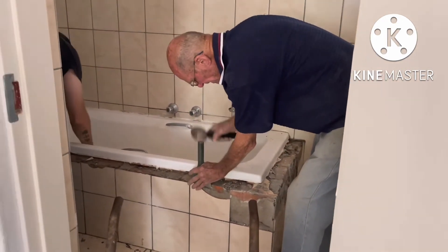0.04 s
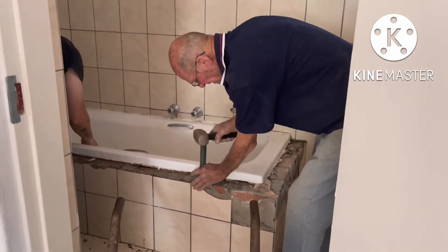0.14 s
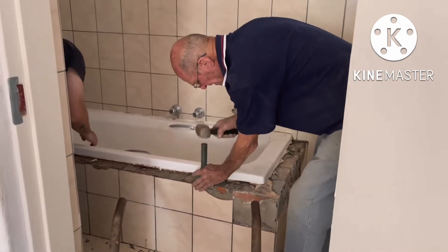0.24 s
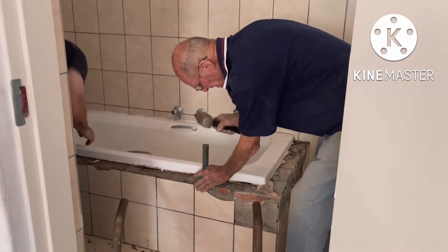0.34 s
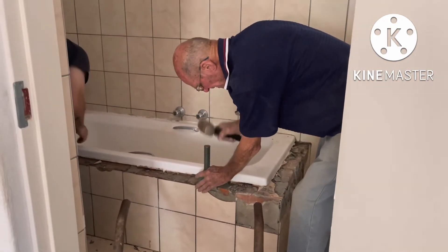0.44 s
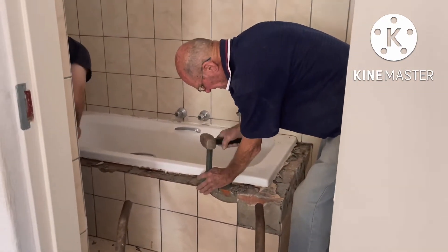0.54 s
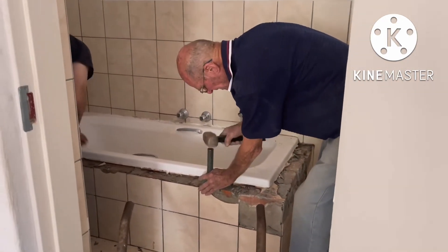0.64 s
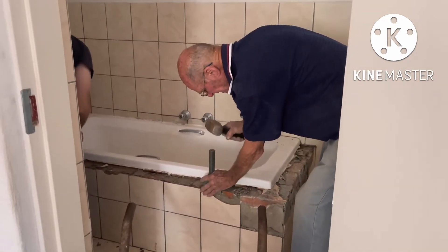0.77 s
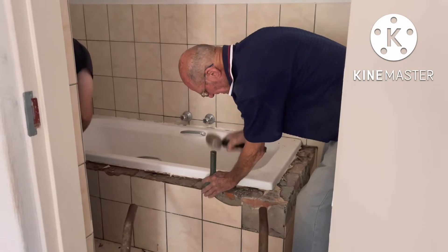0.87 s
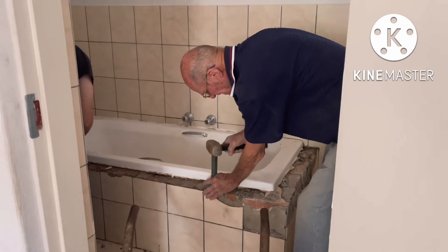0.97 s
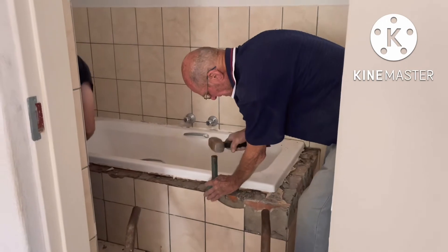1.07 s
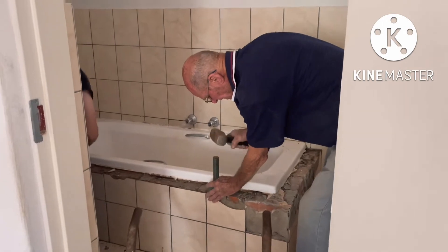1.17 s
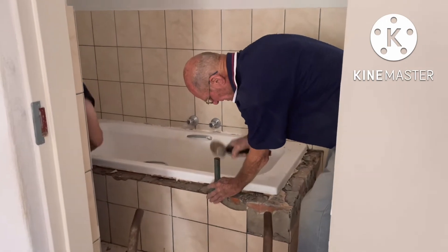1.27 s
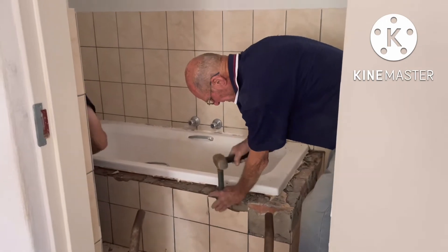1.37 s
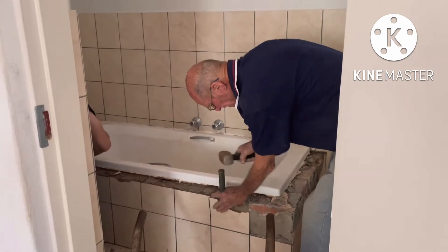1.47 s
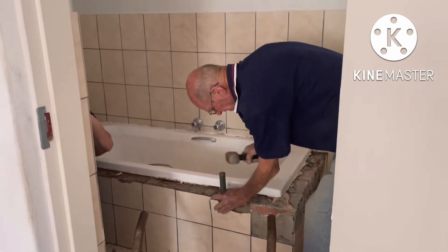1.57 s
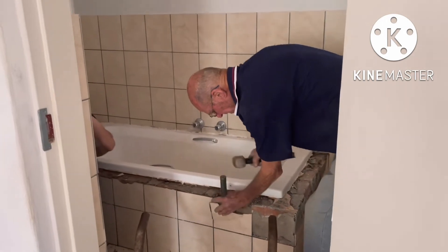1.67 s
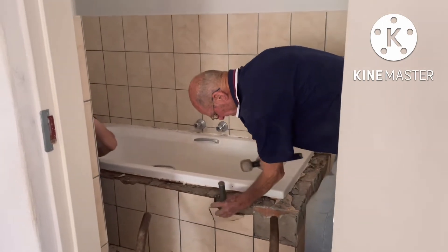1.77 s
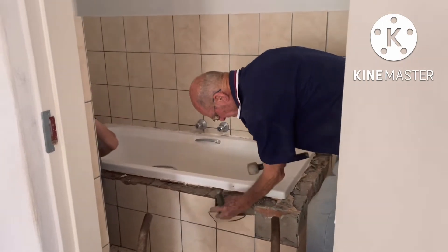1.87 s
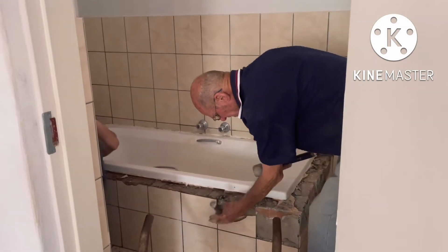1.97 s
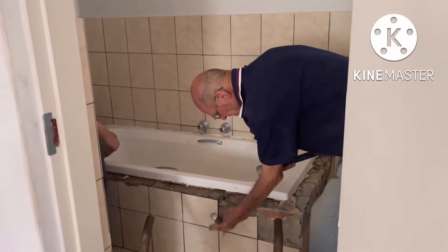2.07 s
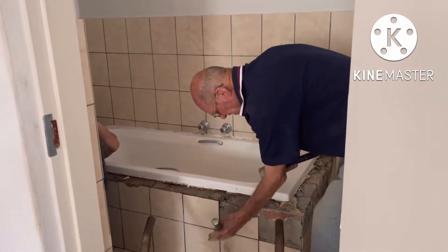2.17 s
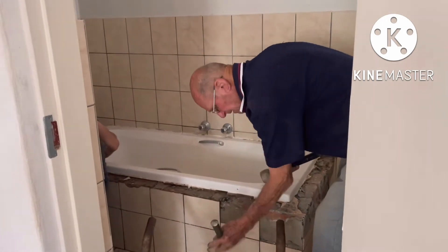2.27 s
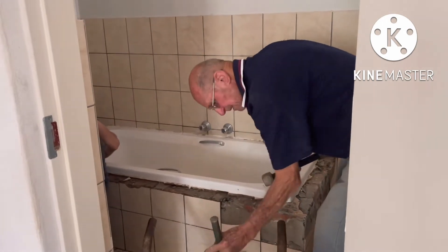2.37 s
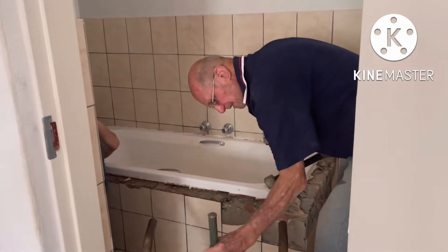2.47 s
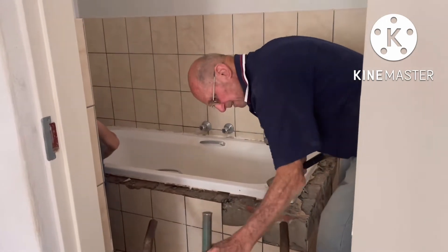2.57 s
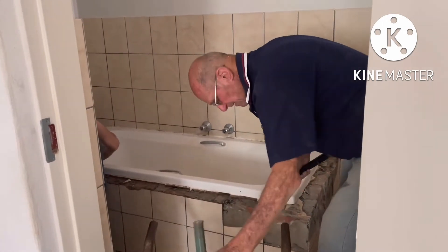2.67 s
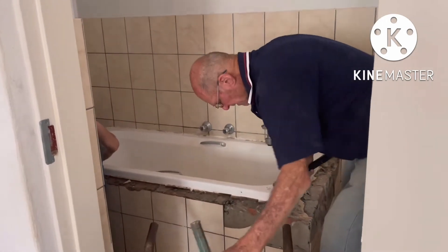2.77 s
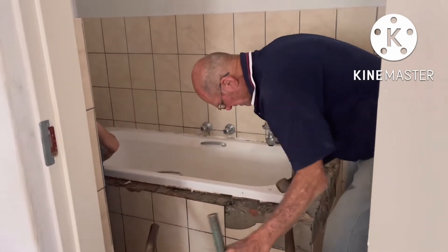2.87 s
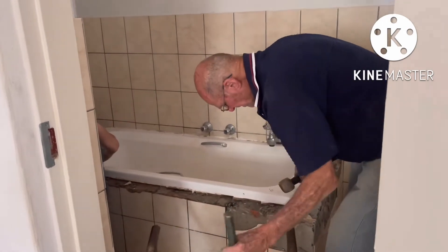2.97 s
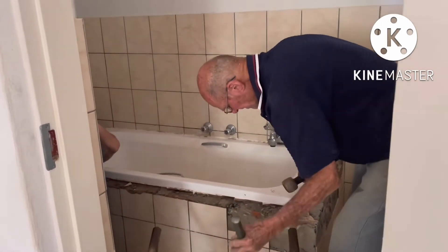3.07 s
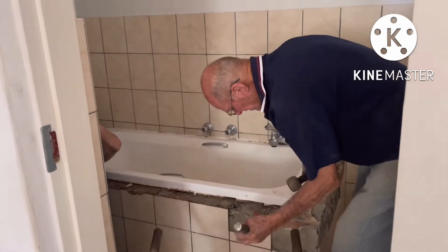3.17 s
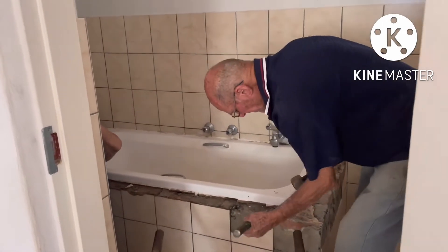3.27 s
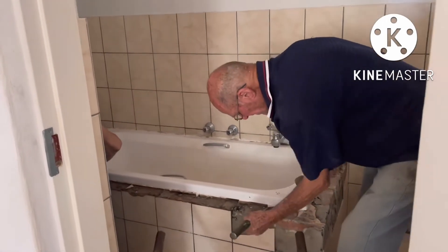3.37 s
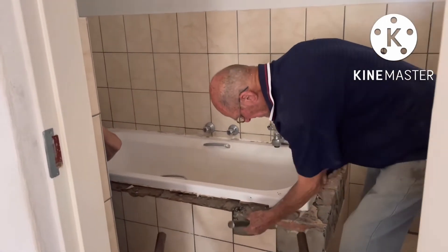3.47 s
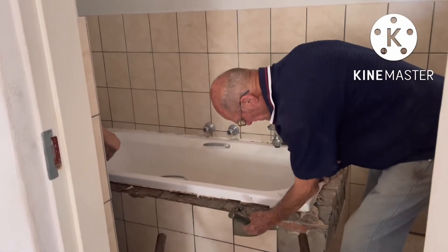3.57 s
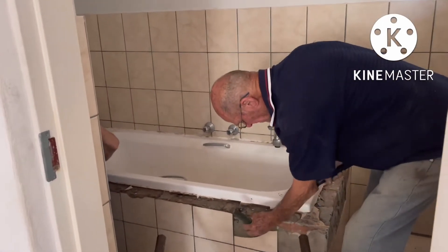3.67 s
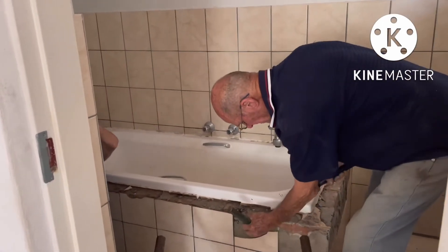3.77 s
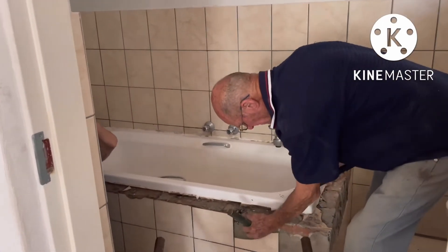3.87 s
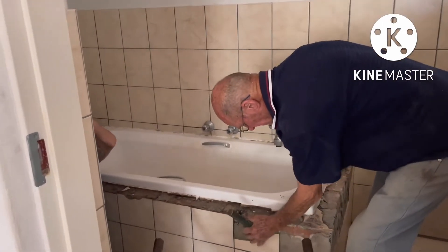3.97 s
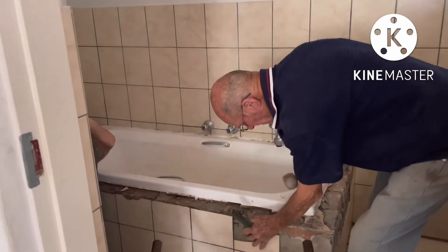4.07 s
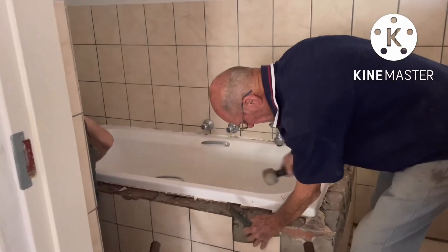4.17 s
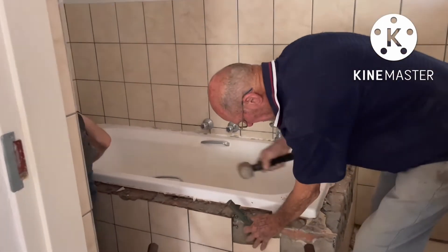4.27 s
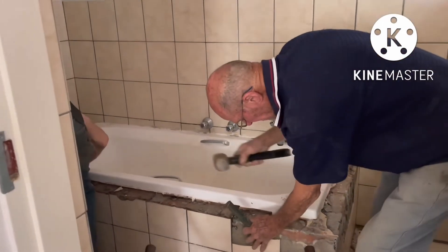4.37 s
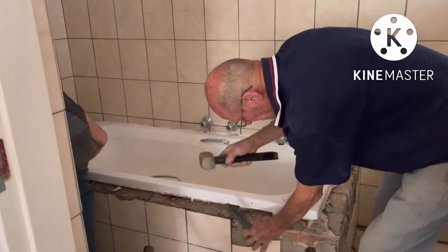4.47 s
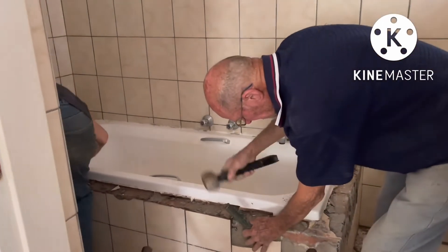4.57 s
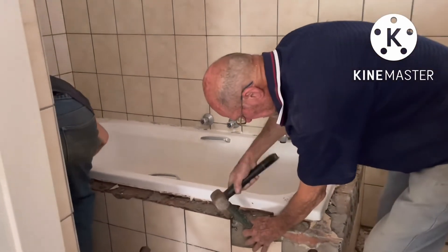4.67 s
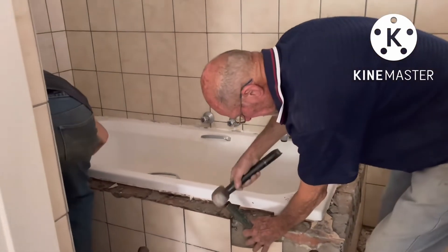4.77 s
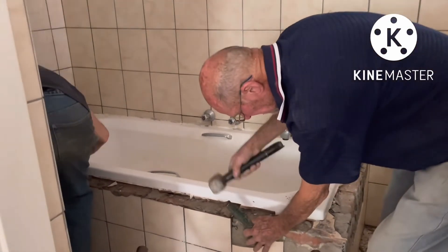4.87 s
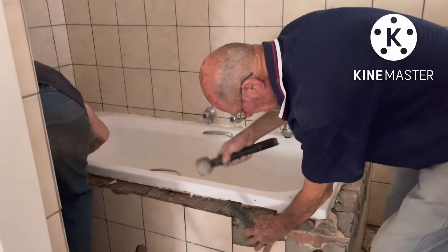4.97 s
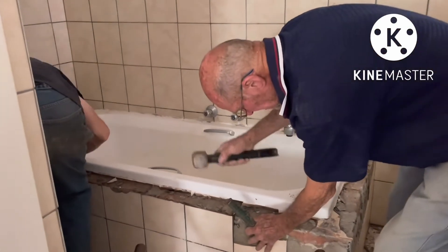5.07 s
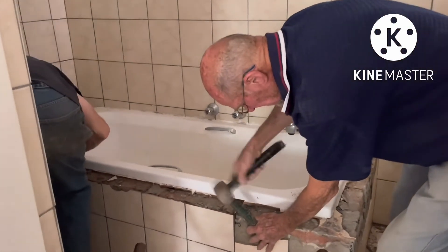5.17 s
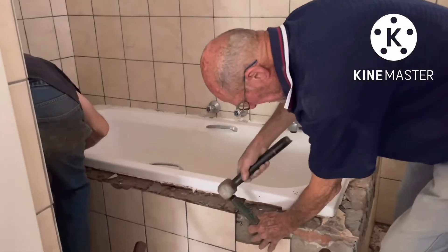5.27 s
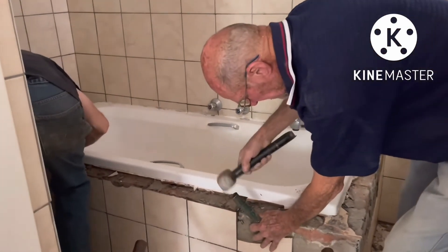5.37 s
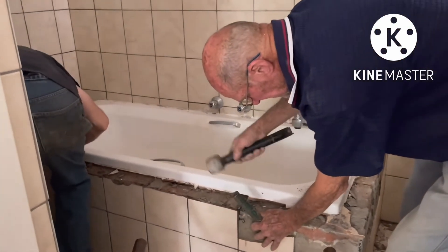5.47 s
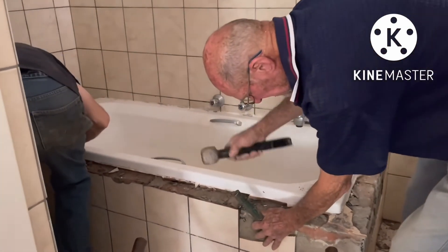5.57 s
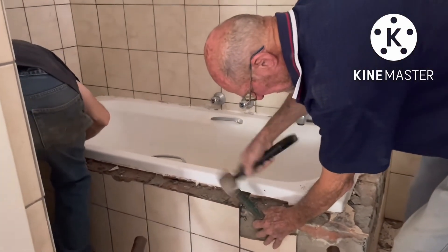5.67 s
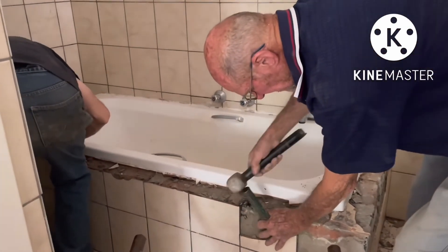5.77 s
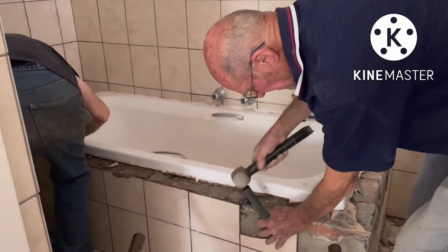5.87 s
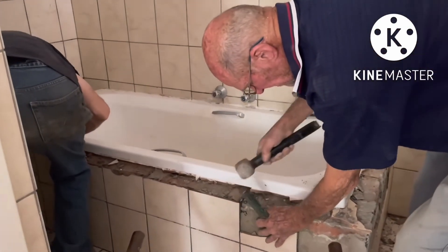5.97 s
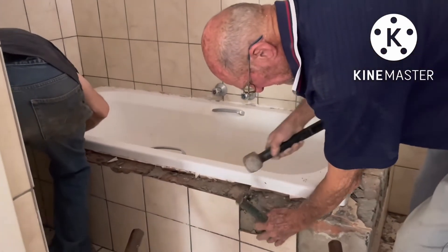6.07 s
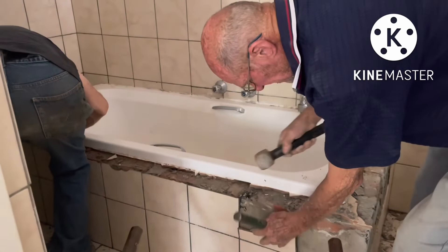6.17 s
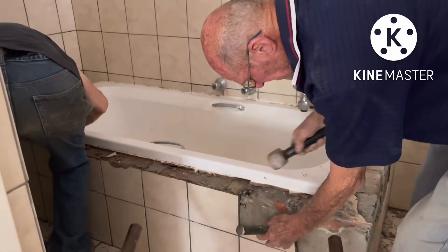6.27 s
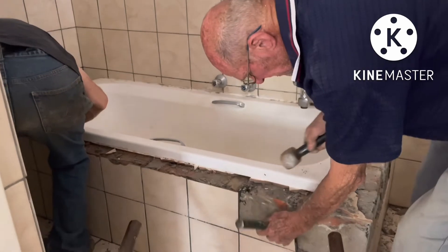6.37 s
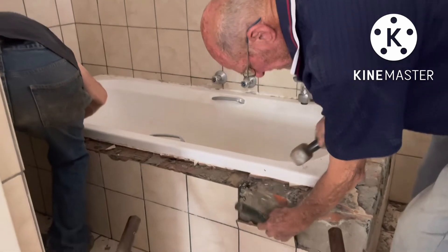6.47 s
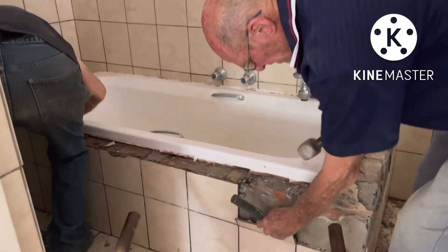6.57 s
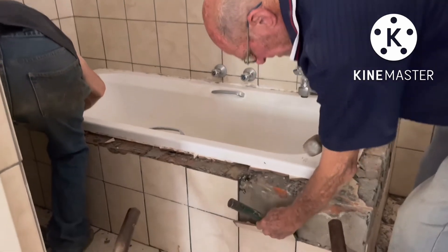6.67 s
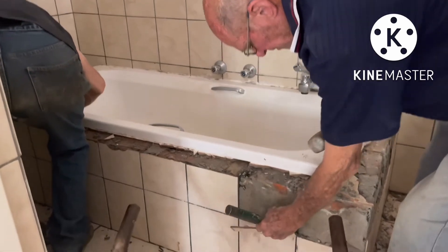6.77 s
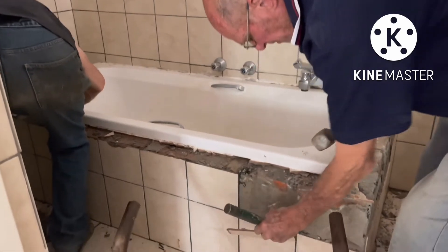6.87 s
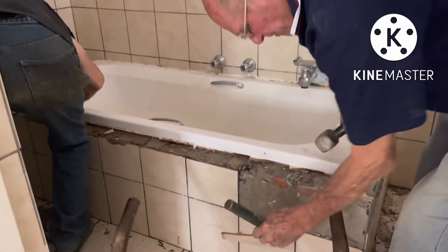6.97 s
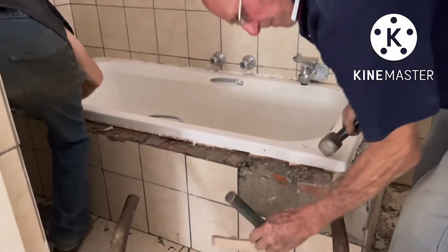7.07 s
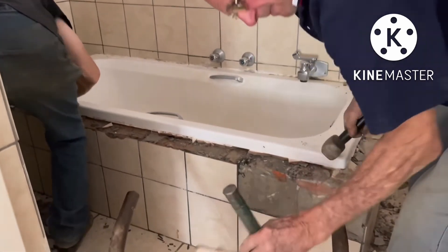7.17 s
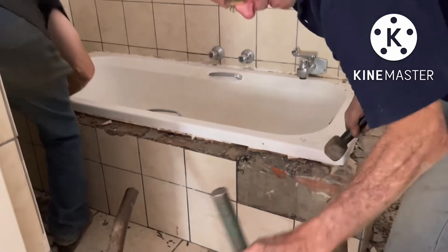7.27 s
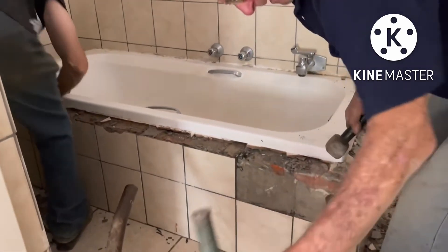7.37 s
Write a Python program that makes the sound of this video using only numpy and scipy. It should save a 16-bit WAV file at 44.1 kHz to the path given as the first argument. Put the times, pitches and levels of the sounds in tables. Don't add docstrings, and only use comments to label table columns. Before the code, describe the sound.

In a small, hard tiled bathroom, four sharp hammer-on-chisel blows crack brick, with a low judder along the tub after the first. A gritty lull follows, then another strong blow snaps off a shard and rubble bumps hollowly on the bathtub. After quiet scraping and ticks, three heavier, spaced blows ring out, leaving light chips and clinks. Close phone microphone, loud cracks compressed, about a second of reverberation.

```python
import sys
import numpy as np
from scipy import signal
from scipy.fft import rfft, irfft, next_fast_len
from scipy.io import wavfile

SR = 44100
rng = np.random.default_rng(int(sys.argv[2]) if len(sys.argv) > 2 else 0)


def store_wav(level_fs):
    pcm = np.round(np.clip(np.atleast_2d(level_fs), -1, 1) * 32767)
    wavfile.write(sys.argv[1], SR, pcm.T.astype(np.int16))


def elevation(decibels):
    levels = np.asarray(decibels, float)
    return 10 ** (levels / 20)


N = 327795

# (frequency [Hz], level [dB], t60 [s])
TUB = [(64, -10.5, 0.28), (104, -4.5, 0.19), (144.1, -1, 0.24), (184.25, -3.5, 0.144), (215, 1, 0.13),
       (253.2, -1, 0.087), (321.2, -1.5, 0.065), (458, -5.5, 0.13), (554, -6, 0.085), (604, 0.5, 0.043),
       (760, -13, 0.049), (865, -2, 0.081), (1019, 0, 0.059)]
# (frequency [Hz], likeness [0-1])
LIKENESS = [(100, 0.98), (290, 0.94), (640, 0.01), (1400, 0.07), (3100, 0.49), (6800, 0.79), (10000, 0.98)]


def rms_one(x):
    return x / np.sqrt(np.mean(x ** 2) + 1e-20)


def at_hz(points, hz):
    points = np.array(points)
    return np.interp(np.log(hz), np.log(points[:, 0]), points[:, 1])


def clicks(times_s, gains):
    out = np.full(N, 1e-18)
    out[np.round(np.asarray(times_s) * SR).astype(int)] += gains
    return out


def ring(x, hz, t60_s):
    radius, angle = elevation(-60 / (t60_s * SR)), 2 * np.pi * hz / SR
    return signal.lfilter([0, np.sin(angle)], [1, -2 * radius * np.cos(angle), radius * radius], x)


def band(x, low_hz, high_hz):
    return signal.sosfilt(signal.butter(2, [low_hz, high_hz], "band", fs=SR, output="sos"), x)


def soft(x, cut_hz):
    pole = np.exp(-2 * np.pi * cut_hz / SR)
    return signal.lfilter([(1 - pole) ** 2], [1, -2 * pole, pole * pole], x)


def puffs(times_s, gains, rise_s, t60_s, low_hz, high_hz):
    rise, fall = np.exp(-1 / (rise_s * SR)), elevation(-60 / (t60_s * SR))
    decay = signal.lfilter([1], [1, -fall], clicks(times_s, gains))
    shape = signal.lfilter([1 - rise], [1, -rise], decay)
    return shape * rms_one(band(rng.standard_normal(N), low_hz, high_hz))


def struck(times_s, modes, db, spread_db):
    luck = rng.standard_normal((len(times_s), 2 * len(modes)))
    out = np.zeros(N)
    for k, (hz, mode_db, t60_s) in enumerate(modes):
        gains = elevation(db + mode_db + spread_db * luck[:, 2 * k]) * np.sign(luck[:, 2 * k + 1])
        out += ring(clicks(times_s, gains), hz, t60_s)
    return out


def swells(times_s, swell_s, fade_s, db):
    t = np.arange(0, N + 64, 64) / SR
    late = t[:, None] - times_s
    below_db = 20 * np.maximum(-late / np.maximum(swell_s, 1e-3), late / np.maximum(fade_s, 1e-3))
    gain = np.sqrt(np.sum(elevation(db - below_db) ** 2, axis=1))
    return np.interp(np.arange(N) / SR, t, gain)


def spread(mid, side, hz):
    alike = np.clip(at_hz(LIKENESS, hz), 0, 1)
    return np.sqrt(1 + alike) * mid + np.sqrt(1 - alike) * side * [[1], [-1]]


def steady(colour):
    hz = np.arange(1, N // 2 + 2) * SR / N
    mid, side = rfft(rng.standard_normal((2, N)))
    return rms_one(irfft(spread(mid, side, hz) * elevation(at_hz(colour, hz)), N))


def notes(places, strengths, swell_s):
    out, t = np.zeros(N), np.arange(16384) / SR
    for (s, hz), (db, t60_s) in zip(places, strengths):
        part = out[round(s * SR):][:len(t)]
        envelope = elevation(db - 60 * t / max(t60_s, .01)) * (1 - np.exp(-t / swell_s))
        part += (envelope * np.sin(2 * np.pi * hz * t))[:len(part)]
    return out


def blows():
    # (time [s], crack [dB], thud [dB], stone [dB])
    blow_table = [
        (0.0454, 0, -20.5, -8.5),
        (0.4788, 5.5, -57, -6),
        (0.8887, 1.5, -36, -9),
        (1.2865, 11, -33, -5.5),
        (2.7852, 7.5, -33, -6.5),
        (2.8126, -8, -66, -20.5),
        (4.63, 3.5, -18.5, -6.5),
        (5.179, 7, -19.5, -7.5),
        (5.6836, 7, -27, -8),
    ]
    s, crack_db, thud_db, stone_db = np.transpose(blow_table)
    s = s - .0012
    early = puffs(s - .007, elevation(stone_db - 23.5), 0.0039, 0.015, 370, 12000)
    thud = struck(s + 0.00373, TUB[:7], thud_db - 3.5, spread_db=1.5)
    thud += puffs(s, elevation(thud_db - 4.5), 0.012, 0.133, 88, 480)
    return early + masonry(s, crack_db, stone_db) + steel() + thud


def masonry(times_s, crack_db, stone_db):
    # (frequency [Hz], level [dB])
    pieces = [
        [(800, 0), (1260, 2.5), (2040, 1), (2680, 1.5), (3490, 0), (4500, -6.5), (5400, -9.5), (6380, -7),
         (7650, -5)],
        [(620, -1.5), (1190, 1), (2040, 1), (2740, -2), (3580, -4.5), (4600, -6.5), (5300, -9), (6120, -6.5),
         (7700, -8)],
        [(560, -1), (870, 0), (1350, 1), (1920, -2.5), (2330, -1.5), (3450, 0), (4700, -6.5), (5910, -2.5),
         (8350, -6)],
        [(780, -2), (1400, 0.5), (2110, -1.5), (2620, 0), (3380, -13.5), (3830, -2), (5850, -5.5)],
        [(710, 1.5), (1390, 0.5), (2680, -0.5), (3400, -2), (4240, -7), (4750, -3), (7520, 2)],
        [(1520, 3), (2600, 5), (3100, -12.5), (4600, -2), (5710, 4), (6500, -6), (7500, -9)],
        [(850, -7), (1350, -0.5), (1850, -1), (2310, -1.5), (3730, -1), (5290, -6), (6220, -11.5), (7700, -13)],
        [(1250, 3), (1890, 1), (2950, -0.5), (4290, 1), (5590, -4.5), (7700, -8)],
        [(1030, 0), (1910, -3), (2920, -8), (3590, -2), (4740, -8), (5670, -5), (7650, -6)],
    ]
    # note decay at 1 kHz, t60 [s]
    note_t60_s = [0.013, 0.011, .011, 0.00821, 0.0085, 0.0099, .011, 0.0087, 0.015]
    splinter_db = [13, 6, 1, 3.5, 6.5, 15, 5, 4.5, 0]
    damping = 0.4
    out, tap = np.zeros(N), np.eye(1, 4096, 128)[0] + 1e-18
    crack, splinters = band(tap, 352, 4900), band(tap, 7130, 8830)
    luck = rng.random((len(times_s), 48))
    for i, at_s in enumerate(times_s):
        body = np.zeros(4096)
        for k, (hz, db) in enumerate(pieces[i]):
            khz = hz / 1000
            body += (-1) ** k * elevation(db) * khz ** damping * ring(tap, hz, note_t60_s[i] * khz ** -damping)
        fracture = elevation(crack_db[i]) * (crack + elevation(splinter_db[i]) * splinters)
        out[round(at_s * SR) - 128:][:4096] += crush(fracture + elevation(stone_db[i]) * body, luck[i])
    return out


def crush(x, luck):
    crush_s = .006
    knots = np.linspace(0, len(x) // 2, len(luck))
    late = np.interp(np.arange(len(x) // 2 + 1), knots, luck ** 2 * crush_s * SR)
    return irfft(rfft(x) * np.exp(-2j * np.pi * np.cumsum(late) / len(x)), len(x))


def steel():
    # (time [s], mode groups near 11.1 kHz [dB], 3.3 kHz [dB], 3.85 kHz [dB], 7.67 kHz [dB])
    contacts = [(0.0444, -1, -22, -31, -16), (0.4765, -5.5, -25, -23, -16.5), (0.891, -1, -31, -40, -55),
                (1.2859, -5, -16, -21.5, -22.5), (1.319, -2, -9, -19, -35), (2.785, -40, -25, -46, -40),
                (3.65, -37.5, -53.5, -49, -60), (3.688, -50.5, -44.5, -42, -60),
                (4.6338, -1.5, -38, -30, -18), (5.177, -6, -21.5, -38.5, -30),
                (5.686, -3.5, -48.5, -30.5, -39.5)]
    mode_hz = [
        [11075, 11150, 11640],
        [3281, 3322, 3165],
        [3836, 3866, 6325, 6821],
        [5846, 8900],
        [7670, 7625, 7735],
    ]
    # (level [dB], t60 [s])
    mode_strengths = [
        [(3, 0.033), (-12, 0.042), (-22.5, 0.12)],
        [(-8.5, 0.284), (0.5, 0.065), (-22, 0.17)],
        [(-1.5, 0.12), (-13.5, 0.1), (-6, 0.25), (-3.5, 0.09)],
        [(0, 0.1), (-12, 0.07)],
        [(-1.5, 0.25), (-18.5, 0.05), (-10.5, .04)],
    ]
    rows = np.array(contacts)
    rows = np.insert(rows, 4, rows[:, 2] - 6.5, axis=1)
    out = np.zeros(N)
    for k, (hz, strengths) in enumerate(zip(mode_hz, mode_strengths)):
        out += struck(rows[:, 0], np.column_stack((hz, strengths)), rows[:, 1 + k] - 5, spread_db=3.0)
    grip_db = 3.5 * rms_one(soft(rng.standard_normal(N), 40))
    return soft(out * elevation(grip_db), 15000)


def snap():
    # (time [s], peak [dB])
    snaps = [
        (2.812, -3.5),
    ]
    s, db = np.transpose(snaps)
    return puffs(s - .001, elevation(db + 5.0), 0.0007, 0.014, 2500, 12000)


def tile_notes():
    # (time [s], frequency [Hz])
    places = [(.479, 1190), (.479, 2034), (.479, 2127), (.479, 3550), (.479, 3677), (.889, 880),
              (.889, 1325), (.889, 1935), (.889, 2340), (1.3, 1500), (4.631, 3708), (5.18, 1300),
              (5.18, 1880), (5.18, 4414), (5.18, 7682), (5.685, 984), (5.685, 1162), (5.685, 1900),
              (5.685, 1990), (5.685, 2731), (5.685, 6500), (5.685, 7673)]
    # (peak [dB], t60 [s])
    strengths = [(-25, .12), (-18, .15), (-21, .2), (-26, 0.14), (-25.5, 0.135), (-24, 0.176), (-28, 0.093),
                 (-22.5, .12), (-24.5, 0.093), (-21, 0.101), (-20, 0.14), (-25, 0.089), (-20, .15),
                 (-31, 0.107), (-33, .12), (-29, 0.15), (-29, 0.113), (-25, 0.23), (-24, .35), (-30, .15),
                 (-33, 0.092), (-39, .15)]
    return notes(places, strengths, swell_s=.001)


def hollow_notes():
    # (time [s], frequency [Hz])
    places = [(2.908, 232), (2.908, 700), (3.008, 232), (3.064, 555), (3.11, 450), (3.15, 222), (3.2, 225),
              (3.274, 700), (3.274, 1000), (3.375, 200), (4.633, 214), (4.633, 104), (5.182, 214)]
    # (peak [dB], t60 [s])
    strengths = [(-16.5, 0.14), (-21, 0.155), (-15.5, 0.15), (-16, 0.076), (-24.5, 0.18), (-20.5, .12),
                 (-27, .1), (-21, 0.14), (-29, .08), (-26, .1), (-19.5, 0.23), (-20, 0.28), (-22, 0.193)]
    return notes(places, strengths, swell_s=0.0076)


def clink_notes():
    # (time [s], frequency [Hz])
    places = [(3.612, 8230), (3.622, 3850), (3.635, 5868), (3.635, 6320), (3.635, 6831), (3.64, 3316),
              (3.645, 3838), (3.647, 3866), (3.685, 3850), (7.063, 2075), (7.082, 1900), (7.098, 2040),
              (7.113, 1782), (7.113, 5260), (7.14, 1960), (7.35, 3316), (7.36, 3850), (7.388, 1800),
              (7.388, 1000), (7.416, 2760), (7.416, 4620), (7.416, 6000)]
    # (peak [dB], t60 [s])
    strengths = [(-41.5, 0.16), (-39, 0.079), (-39.5, 0.2), (-42.5, .25), (-44, 0.21), (-43.5, .3),
                 (-26.5, 0.23), (-31, 0.23), (-36, 0.1), (-39, 0.2), (-29.5, 0.045), (-41, 0.13),
                 (-40.5, 0.11), (-44, 0.054), (-43.5, 0.067), (-61, 0.37), (-53.5, 0.3), (-51, 0.19),
                 (-50, 0.19), (-39, .1), (-44, .1), (-36, .05)]
    return notes(places, strengths, swell_s=.003)


def bumps():
    # (time [s], peak [dB], hollow note [Hz], rattle [dB])
    bump_table = [(2.909, -15, 239, -18), (3.011, -18, 238, -23), (3.069, -16.5, 526, -19),
                  (3.099, -17, 666, -30), (3.159, -24, 215, -48), (3.209, -22, 220.5, -44),
                  (3.278, -17.5, 250, -29), (3.299, -20.5, 693, -24), (3.339, -22, 221.4, -28),
                  (3.379, -30.5, 223, -32.5), (3.417, -43, 215, -37), (3.46, -31.5, 215, -61),
                  (3.646, -30.5, 180.8, -37), (3.688, -50, 190.7, -55), (3.759, -42, 276, -33),
                  (6.208, -42.5, 206, -42.5), (6.412, -57, 207, -43)]
    # (time [s], deep thud [dB])
    settling = [
        (3.068, -50),
        (3.42, -46),
        (3.646, -45),
        (3.76, -41.5),
        (3.928, -57.5),
        (6.41, -57.5),
    ]
    s, db, hollow_hz, rattle_db = np.transpose(bump_table)
    deep_s, deep_db = np.transpose(settling)
    hollow = np.zeros(N)
    for at_s, peak_db, hz in zip(s, db, hollow_hz):
        tap = elevation(peak_db - 3.0) * np.eye(1, 8192)[0] + 1e-18
        hollow[round(at_s * SR):][:8192] += ring(tap, hz, 0.093)
    shell_modes = [(hz, mode_db, 1.07 * t60_s) for hz, mode_db, t60_s in TUB[3:]]
    shell = struck(s, shell_modes, db - 13.0, spread_db=4.5)
    deep = struck(deep_s, TUB[1:3], deep_db + 3.5, spread_db=5.5)
    clatter = puffs(s, elevation(db - 7.0), 0.0014, 0.091, 220, 1656)
    clatter += puffs(s, elevation(rattle_db), 0.0059, 0.048, 1200, 16400)
    return band(band(hollow + shell, 135, 2800), 135, 2800) + soft(deep, 400) + clatter


def judder():
    # (time [s], level [dB], slip rate [1/s])
    slide = [
        (0.225, -16, 107.7),
        (0.24, -18, 102),
        (0.285, -16.5, 114),
        (0.303, -18, 125),
        (0.322, -15.5, 105.5),
        (0.346, -17.5, 113.5),
        (0.376, -17, 116.5),
        (0.409, -33, 115),
        (0.431, -47, 93),
    ]
    # (frequency [Hz], level [dB], t60 [s])
    panel = [(109.2, 1, 0.0345), (186.2, -1, 0.11), (250, -3, 0.03), (323, -3.5, 0.023), (462, -2.5, 0.027),
             (573, -3.5, 0.017)]
    t, (s, db, slips_per_s) = np.arange(N) / SR, np.transpose(slide)
    rate = np.interp(t, s, slips_per_s) * (1 + .08 * rms_one(soft(rng.standard_normal(N), 60)))
    slips = np.diff(np.floor(np.cumsum(rate) / SR), prepend=0) * elevation(3 * rng.standard_normal(N))
    fade = np.clip(np.minimum(t - s[0] + .03, s[-1] - t + .045) / .03, 0, 1)
    push = soft(slips * fade * elevation(np.interp(t, s, db)), 1360) + 1e-18
    return elevation(-5.5) * sum(elevation(mode_db) * ring(push, hz, t60_s) for hz, mode_db, t60_s in panel)


def chips():
    # (time [s], peak [dB], pitch [Hz], t60 [s], left-right [dB])
    chip_table = [(2.072, -33.5, 636, 0.1, -6), (3.004, -16, 622, 0.053, -1),
                  (3.255, -14.5, 1922, 0.014, 0.5), (3.91, -34, 7650, 0.065, 10),
                  (4.171, -38, 6570, 0.023, 0), (6.41, -34, 1650, 0.018, -3),
                  (6.614, -26.5, 4130, 0.041, 3), (6.672, -28.5, 8564, 0.0203, 19),
                  (6.857, -23.5, 8007, 0.017, 5), (7.066, -42, 2060, 0.066, 16.5),
                  (7.084, -38, 1984, 0.046, 30.5), (7.149, -48.5, 1874, 0.047, 16),
                  (7.355, -36.5, 1024, 0.018, 2), (7.393, -38.5, 1790, 0.023, 1),
                  (7.418, -33, 4230, 0.081, 11.5)]
    # (time [s], peak [dB], pitch [Hz], t60 [s], left-right [dB])
    extra_voices = [
        (2.0668, -40, 3100, 0.042, 4),
        (6.42, -38.5, 213, 0.11, -1),
        (1.301, -11.5, 2600, 0.15, 4),
        (3.258, -18.5, 2610, 0.023, 17),
        (7.065, -33.5, 5300, 0.047, 4),
        (7.099, -43, 5100, 0.037, -2),
    ]
    # (time [s], peak [dB], pitch [Hz], t60 [s], left-right [dB])
    grazes = [
        (4.255, -35.5, 2800, 0.0166, 4),
        (4.310, -42, 3150, 0.08, 10),
        (4.381, -31, 3420, 0.022, 9.5),
        (6.6, -40, 4000, 0.057, 1.5),
    ]
    every = chip_table + extra_voices + grazes
    out, luck = np.zeros((2, N)), rng.uniform(-0.94, 1, (len(every), 2))
    for (s, db, hz, t60_s, pan_db), (low_luck, high_luck) in zip(every, luck):
        at = round(s * SR)
        tick = elevation(db - 9.5) * np.eye(1, min(8192, N - at))[0] + 1e-18
        sound = ring(tick, hz, t60_s)
        sound += 0.1 * ring(tick, hz * (0.43 + 0.14 * low_luck), t60_s)
        sound += 0.28 * ring(tick, min(hz * (1.5 + 0.5 * high_luck), 12000), t60_s / 2)
        out[:, at:at + len(tick)] += sound * elevation(np.array([[.5], [-.5]]) * pan_db)
    dusty = np.array(chip_table + grazes)
    return out + puffs(dusty[:, 0], elevation(dusty[:, 1] - 11.5), 0.00041, 0.029, 1030, 15300)


def knocks():
    # (time [s], peak [dB], low edge [Hz], high edge [Hz], t60 [s])
    knock_table = [(2.068, -31, 504, 3200, .05), (2.784, -17, 14900, 16300, .02),
                   (2.811, 3, 14000, 16400, 0.063), (4.632, -21, 14900, 16400, 0.041),
                   (3.607, -37, 5930, 10150, 0.0616), (3.878, -29.5, 8000, 9750, 0.034),
                   (3.91, -31, 2030, 9000, 0.018), (4.171, -38, 4950, 11100, 0.0155),
                   (6.378, -42, 1400, 2063, 0.021), (6.413, -42, 814, 2000, 0.046),
                   (6.547, -35.5, 1000, 7000, 0.036), (6.673, -21.5, 3540, 10280, 0.0084),
                   (7.066, -37, 1300, 2100, 0.088), (7.085, -44, 1294, 2150, 0.027),
                   (7.102, -43, 1410, 2150, 0.058), (7.329, -46, 790, 4000, 0.042),
                   (7.393, -37, 3820, 4700, 0.013), (7.418, -27, 2500, 9250, 0.026)]
    out = np.zeros(N)
    for s, db, low_hz, high_hz, t60_s in knock_table:
        body = out[round(s * SR):][:4096]
        fall = elevation(db - 8 - 60 * np.arange(len(body)) / (max(t60_s, .002) * SR))
        body += fall * rms_one(band(rng.standard_normal(4096), low_hz, high_hz))[:len(body)]
    return out


def grit():
    # (loudest time [s], swell [s per 20 dB], fade [s per 20 dB], hiss [dB], scuff [dB])
    strokes = [(0.019, -1, 1.5, -60, -34), (1.02, -6, 0.7, -42, -66), (1.13, 0.05, 0.0161, -50, -29),
               (1.57, 0.34, -0.72, -60, -32), (1.75, 6, -1.5, -59, -73), (2.06, 0, 1.5, -41, -44.5),
               (2.52, 0.24, 0.43, -36, -43), (2.75, 0.6, -1.02, -44, -51), (3.648, -0.9, 0.34, -38.5, -41),
               (3.93, 0.08, 0.22, -38, -48.5), (4.27, 0, 0, -43, -52), (4.6, 0.28, 0.5, -31, -42.5),
               (4.82, 0.2, -0.95, -39, -42), (5.0, 0.5, 0.1, -40, -61), (5.47, 0.07, .5, -38, -41),
               (5.63, 0, 0.1, -36.5, -66), (6.15, 3, 0, -71.5, -46.5), (6.42, -0.1, 1, -46.5, -58),
               (6.64, 0.13, 0.0264, -37, -47), (6.89, 0.51, 0.2, -34.5, -45.5),
               (7.068, 0.15, -2, -65.5, -50), (7.43, -0.1849, -0.7, -29.5, -58)]
    # (frequency [Hz], level [dB])
    hiss_colour = [(2000, -9.5), (3000, -3), (4200, 0.5), (6000, 0.5), (8500, 3), (10200, 5), (11500, 0),
                   (12500, -1.5)]
    s, swell_s, fade_s, hiss_db, scuff_db = np.transpose(strokes)
    grains = (rng.random(N) < 1500 / SR) * elevation(1.3 * np.minimum(rng.exponential(1, N), 4))
    rough = 0.53 + 0.4 * rms_one(soft(grains, 420))
    flat = steady([(100, 0.0021), (4000, 0.0056)])
    scuff = elevation(-4.5) * rms_one(band(flat, 310, 1518)) + rms_one(band(flat, 1241, 2470))
    hiss = steady(hiss_colour) * swells(s, swell_s, fade_s, hiss_db)
    return rough * (hiss + scuff * swells(s, swell_s, fade_s, scuff_db))


def scrapes():
    # (loudest time [s], swell [s per 20 dB], fade [s per 20 dB], level [dB], pitch [Hz])
    drags = [(2.06, 0.2, .2, -43, 9050), (2.09, 0.15, .3, -45.5, 1990), (2.08, 0.1, 0.8, -51, 1056),
             (2.4, 0.5, 0.7, -48, 3700), (2.42, .55, 0.9, -49, 4520), (2.55, -0.2, -0.4, -47, 8900),
             (3.63, -0.56, -0.1, -46, 8300), (3.66, .03, 0.18, -42.5, 1640), (3.86, 1.3, 0.2, -49.5, 8900),
             (3.92, 0.2, 0.35, -52, 2510), (4.34, 0.18, .2, -50, 3470), (4.44, -0.6, .3, -48, 9200),
             (6.42, .02, 0.46, -50.5, 1015), (6.43, -0.1, .2, -51, 1650), (6.45, .03, 0.3, -51, 6370),
             (6.74, -0.7, .3, -50, 2070)]
    width = 0.078
    out, white = np.zeros((2, N)), steady([(100, 0), (4000, 0)])
    for s, swell_s, fade_s, db, hz in drags:
        tone = band(white, hz * (1 - width), hz * (1 + width))
        out += rms_one(tone) * swells(np.array([s]), swell_s, fade_s, db)
    return out


def bathroom(x):
    # (frequency [Hz], t60 [s])
    room_t60 = [(60, 1.18), (160, 1.158), (420, 1.12), (1100, 1.21), (2900, 1.056), (6000, 0.85),
                (12000, 0.28)]
    # (frequency [Hz], level [dB])
    room_colour = [(60, -8.5), (200, -1), (600, 2), (2000, 1), (5000, -1.5), (8000, 2), (12000, 1),
                   (16000, -25)]
    t = np.arange(round(1.3 * SR)) / SR
    edges_hz = 35 * 2 ** np.arange(0, 9.1, .5)
    white = rng.standard_normal((2, 2, len(t)))
    echoes = np.zeros((2, len(t)))
    for k, (low_hz, high_hz) in enumerate(zip(edges_hz, edges_hz[1:])):
        hz = np.sqrt(low_hz * high_hz)
        t60_s = at_hz(room_t60, hz)
        decay = elevation(-60 * t / t60_s) + elevation(5.0) * elevation(-60 * t / (0.265 * t60_s))
        mid, side = band(white[k % 2] * np.minimum(t / 0.00062, 1) * decay, low_hz, high_hz)
        echoes += elevation(at_hz(room_colour, hz)) * spread(mid, side, hz)
    echoes /= np.sqrt(np.sum(echoes ** 2) / 2)
    return signal.oaconvolve(x[None], echoes, axes=1)[:, :N]


def rumble():
    # (loudest time [s], level [dB])
    surges = [(0.0, -38), (0.56, -43.5), (1.1, -50), (2.3, -67.5), (2.92, -71), (3.6, -64.5), (4.2, -62.5),
              (4.8, -71), (5.36, -50.5), (5.9, -56), (6.5, -70.5)]
    s, db = np.transpose(surges)
    surge = elevation(-75.5) + swells(s, 0.43, 0.53, db)
    lumps = elevation(1.7 * rms_one(soft(rng.standard_normal(N), 3.2)))
    return surge * lumps * steady([(25, -16.0), (45, -6.0), (60, 2.5), (75, 1.5), (110, -15.0), (200, -67.0)])


def room_air():
    # (frequency [Hz], level [dB])
    air_colour = [(18, -37), (30, 9.5), (69, 3.5), (1320, 0), (2080, -11), (8880, -14), (10100, -24),
                  (11100, -11), (12000, -26), (16000, -65.5)]
    return elevation(-58.5) * steady(air_colour)


def scene():
    hits, tub = blows(), bumps() + judder()
    small, sand = chips() + knocks(), grit() + scrapes()
    clean = tile_notes() + hollow_notes() + clink_notes()
    send = elevation(4.0) * hits + elevation(-1.5) * tub + elevation(4.0) * small.mean(0)
    send += elevation(-9.0) * sand.mean(0) + elevation(-4.5) * clean
    direct = hits * elevation(np.array([[.7], [-.7]])) + tub + small + clean + snap() + elevation(-3.5) * sand
    return direct + bathroom(send) + room_air() + rumble()


def limiter(x):
    loud_db = 10 * np.log10(soft(np.mean(x ** 2, 0), 51) + 1e-9)
    release_db = 29.4 * np.arange(N) / SR
    held_db = np.maximum.accumulate(loud_db + release_db) - release_db
    return np.tanh(x * elevation(-.6 * np.maximum(held_db + 17.0, 0)) / 1.06) * 1.141


def ports(x):
    # (frequency [Hz], left port's lead [rad])
    port_phase = [(0, 0), (3190, 1), (5940, 0.92), (7490, 1.82), (8790, 0.5), (9820, -3), (10900, -2.5),
                  (12000, -2)]
    # (frequency [Hz], level of the sum [dB])
    sum_colour = [(25, -44), (55, -1), (9000, 1), (9650, 4.5), (9900, -5), (10450, -5), (10650, 3.5),
                  (11200, 4.5), (12000, 0.5), (13100, -43), (14600, -48), (15400, -16), (16400, -61)]
    # (frequency [Hz], level of the difference [dB])
    difference_colour = [(35, -29.5), (55, -3.5), (11600, -0.5), (12300, -47), (16200, -54)]
    size = next_fast_len(N + 4096)
    hz = np.arange(1, size // 2 + 2) * SR / size
    phase_hz, lead_rad = np.transpose(port_phase)
    turn = np.exp(.5j * np.interp(hz, phase_hz, lead_rad) * [[1], [-1]])
    left, right = rfft(x, size) * turn
    mid = (left + right) / 2 * elevation(at_hz(sum_colour, hz))
    side = (left - right) / 2 * elevation(at_hz(difference_colour, hz))
    return irfft([mid + side, mid - side], size)[:, :N]


def low_pass(x):
    return signal.sosfilt(signal.butter(12, 16620, fs=SR, output="sos"), x)


def record(dry):
    mix = np.clip(ports(limiter(dry)), -1, 1)
    return low_pass(mix)


dry = scene()
out = record(dry)
store_wav(out)
```